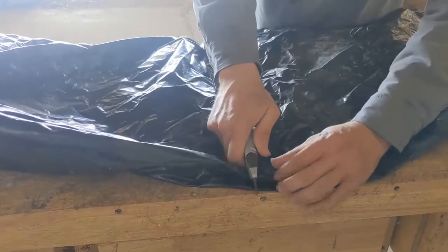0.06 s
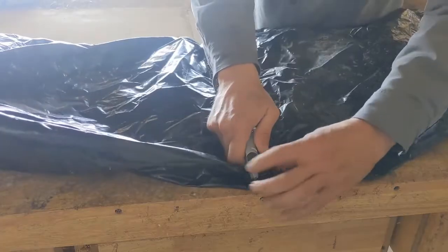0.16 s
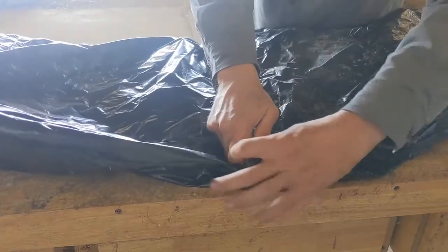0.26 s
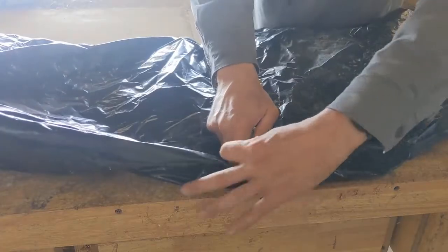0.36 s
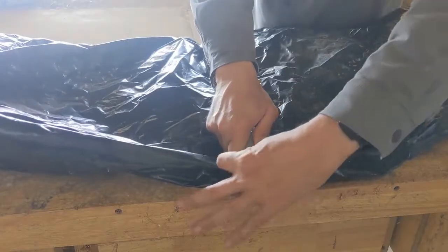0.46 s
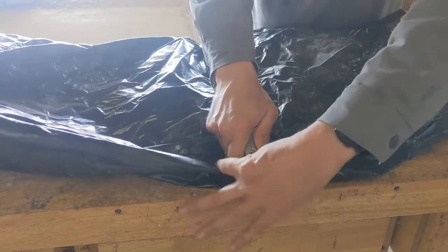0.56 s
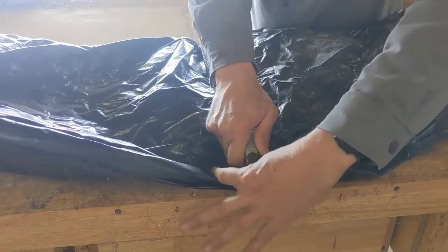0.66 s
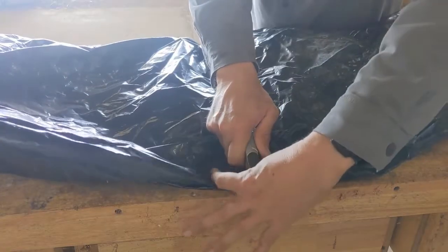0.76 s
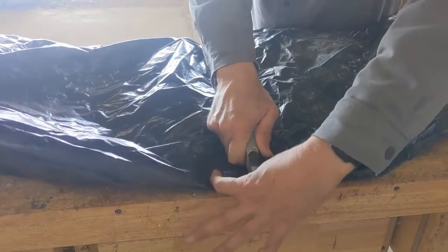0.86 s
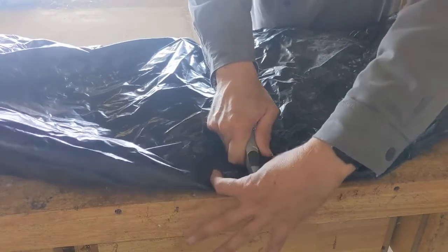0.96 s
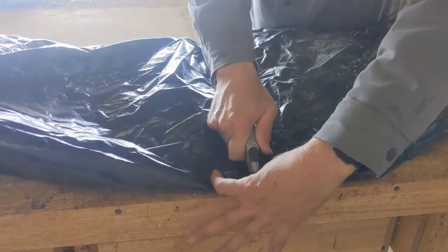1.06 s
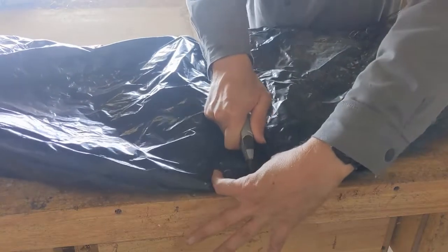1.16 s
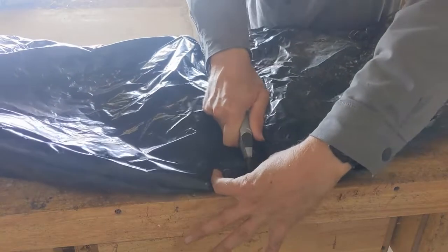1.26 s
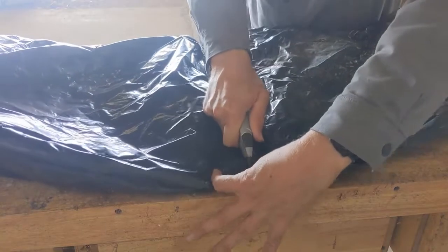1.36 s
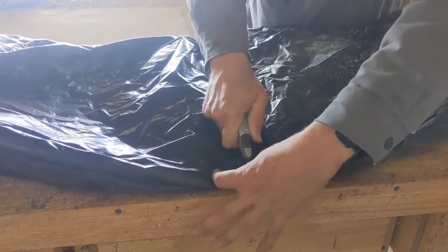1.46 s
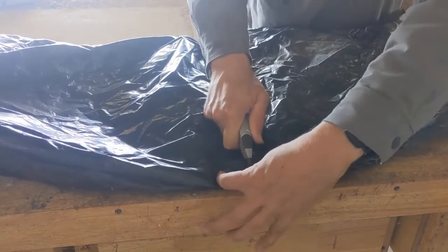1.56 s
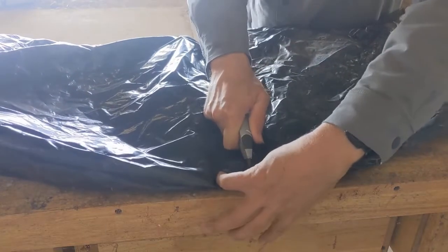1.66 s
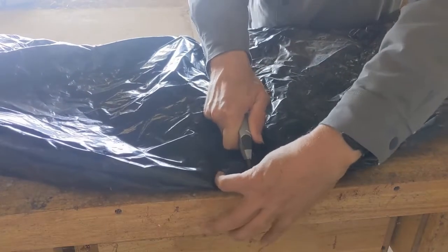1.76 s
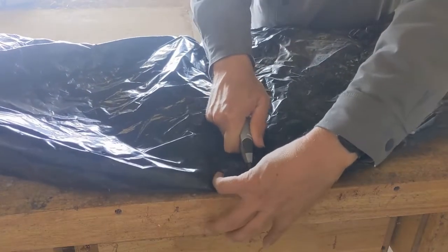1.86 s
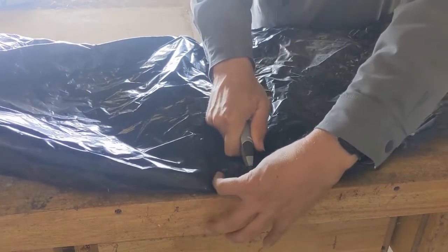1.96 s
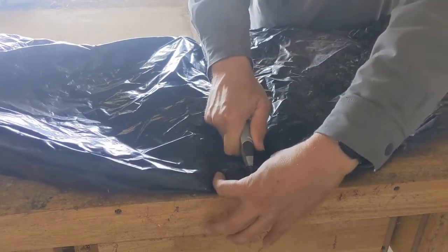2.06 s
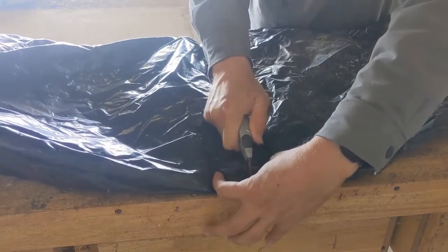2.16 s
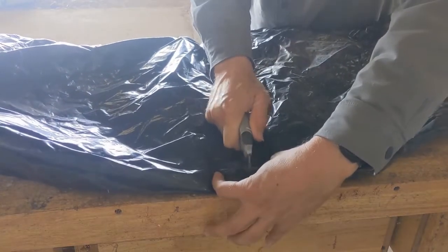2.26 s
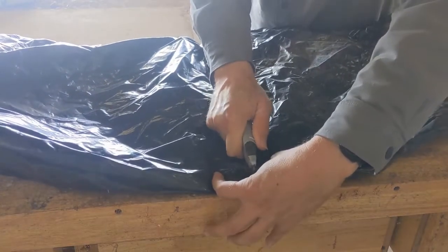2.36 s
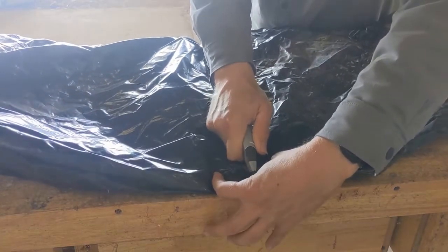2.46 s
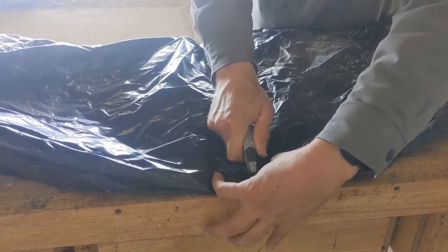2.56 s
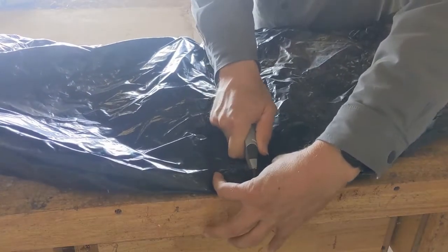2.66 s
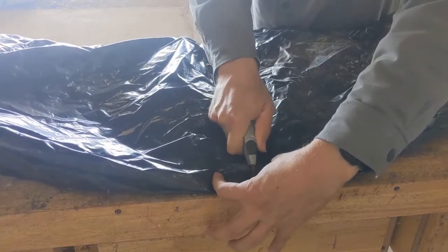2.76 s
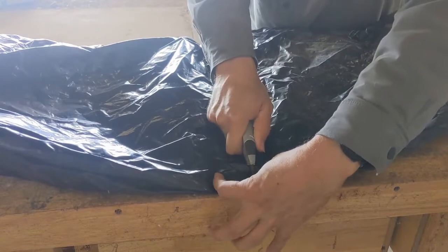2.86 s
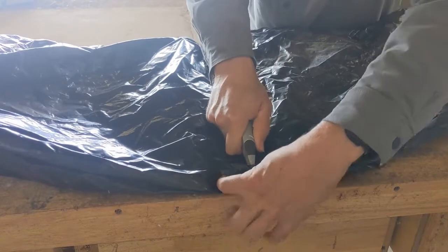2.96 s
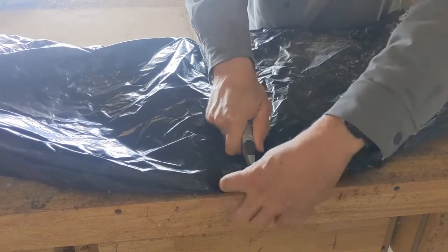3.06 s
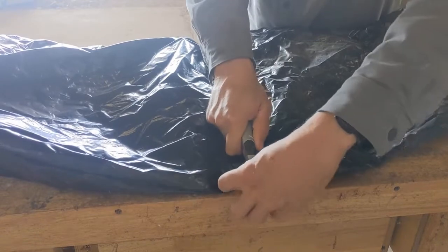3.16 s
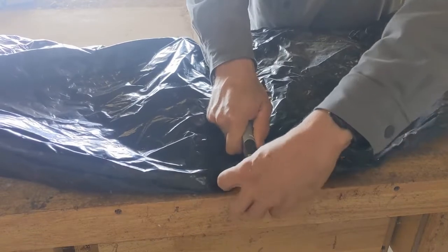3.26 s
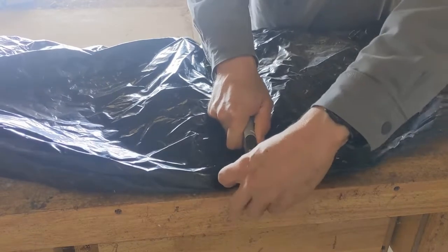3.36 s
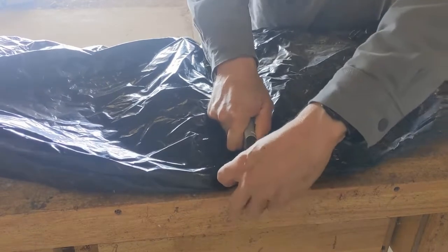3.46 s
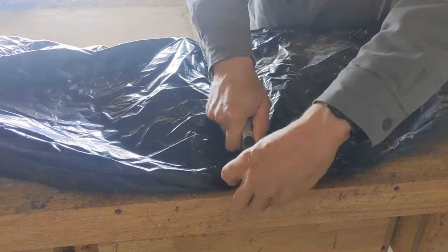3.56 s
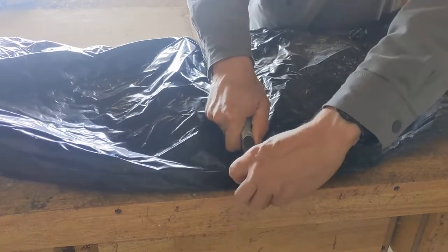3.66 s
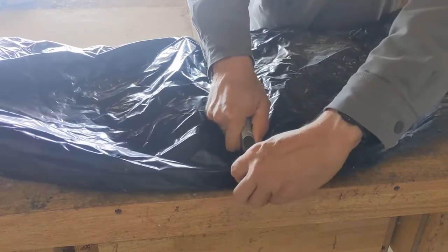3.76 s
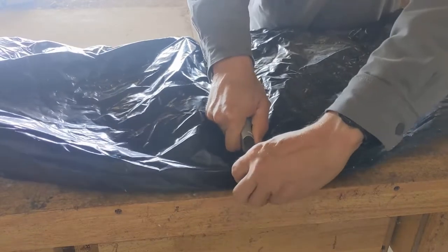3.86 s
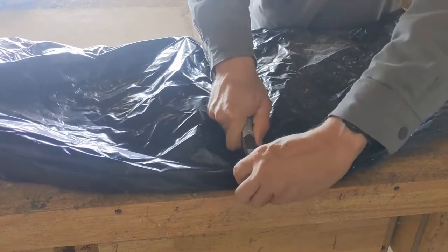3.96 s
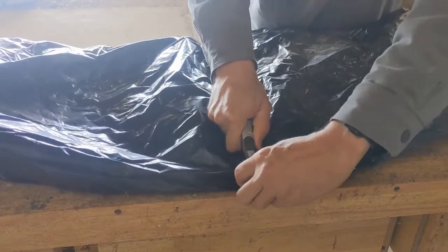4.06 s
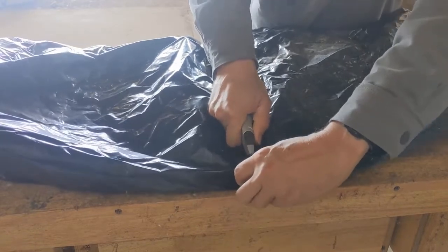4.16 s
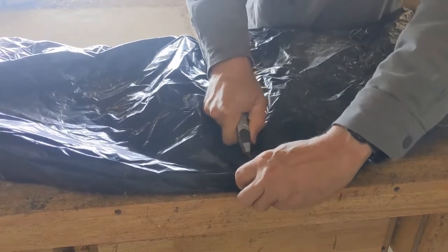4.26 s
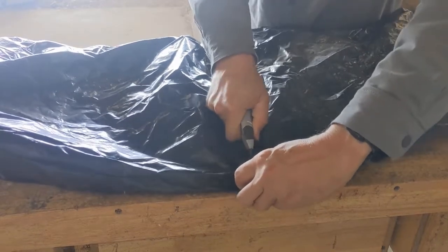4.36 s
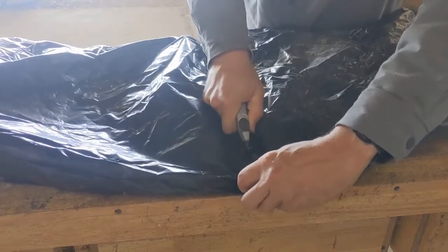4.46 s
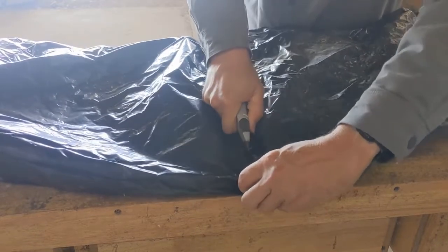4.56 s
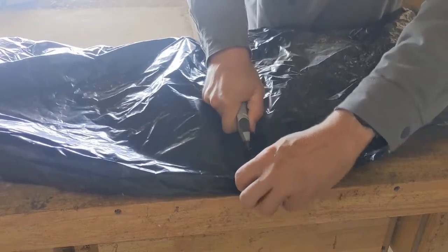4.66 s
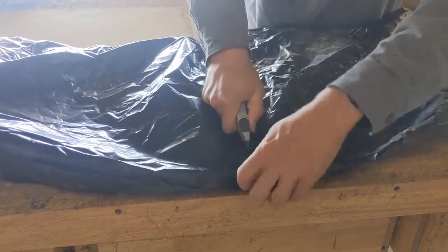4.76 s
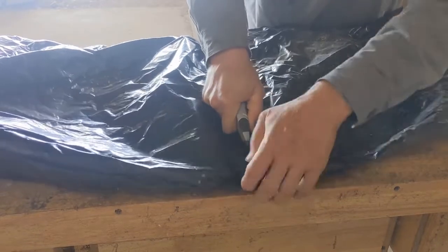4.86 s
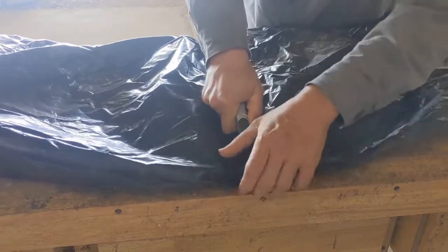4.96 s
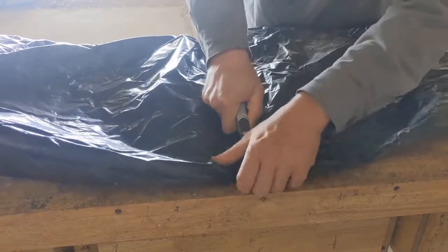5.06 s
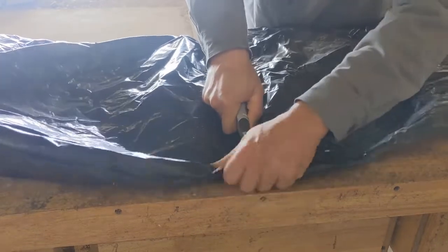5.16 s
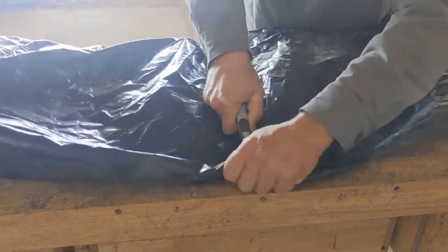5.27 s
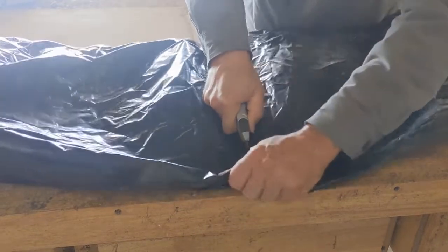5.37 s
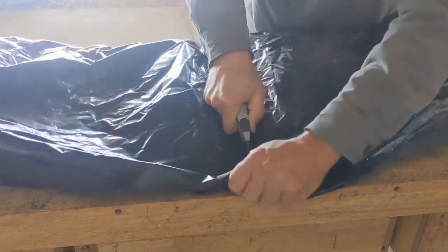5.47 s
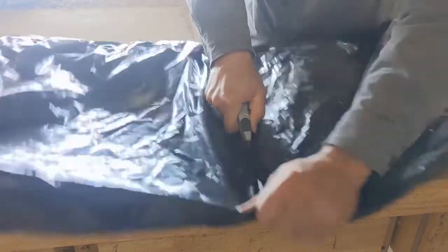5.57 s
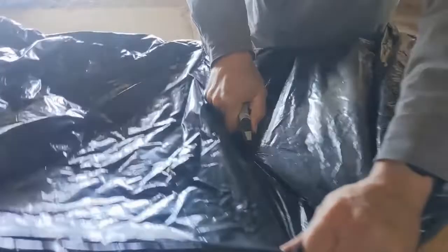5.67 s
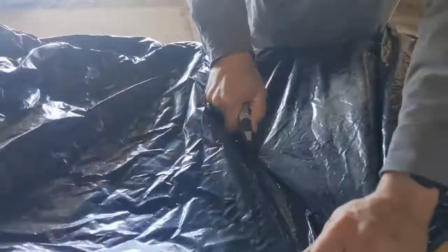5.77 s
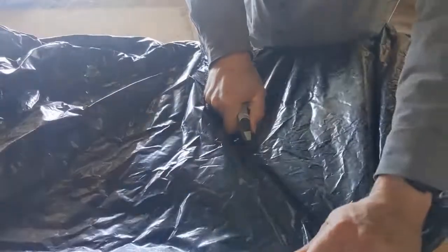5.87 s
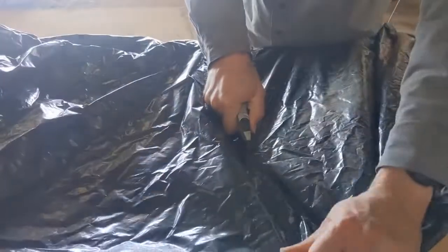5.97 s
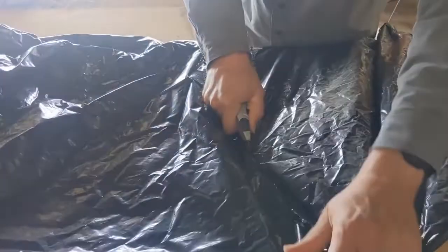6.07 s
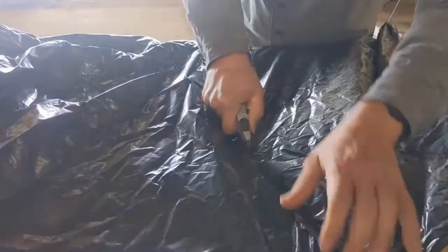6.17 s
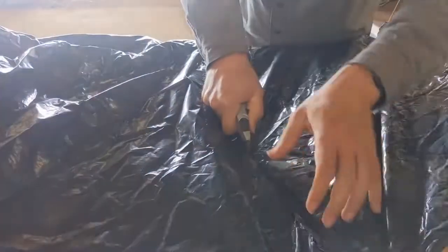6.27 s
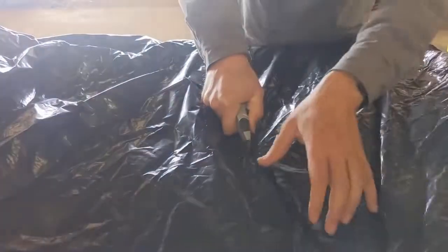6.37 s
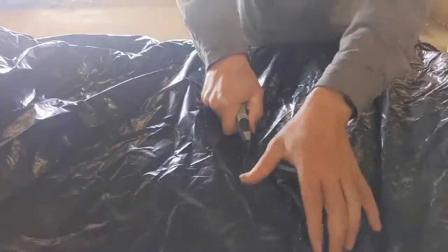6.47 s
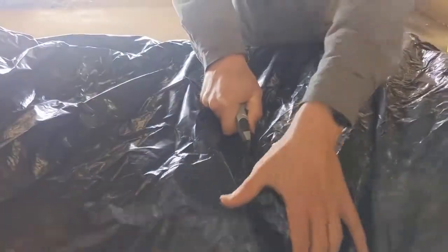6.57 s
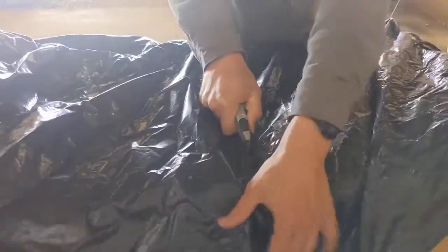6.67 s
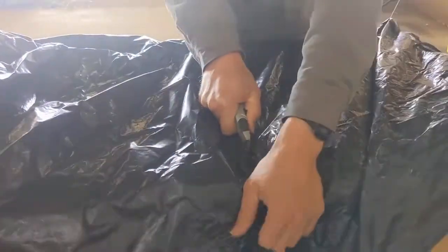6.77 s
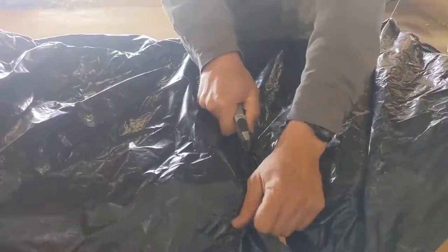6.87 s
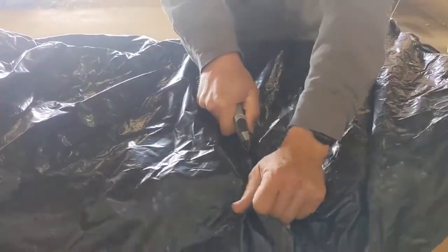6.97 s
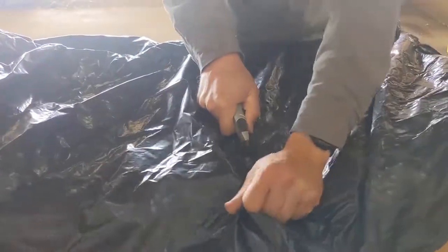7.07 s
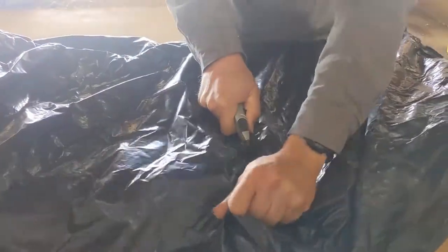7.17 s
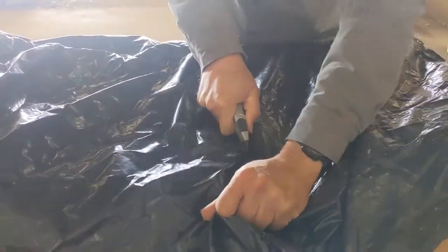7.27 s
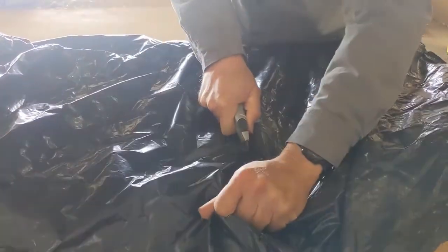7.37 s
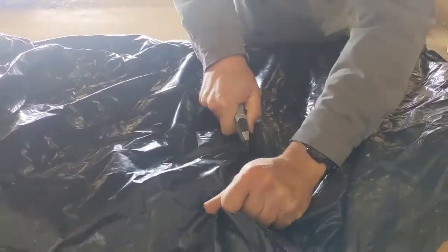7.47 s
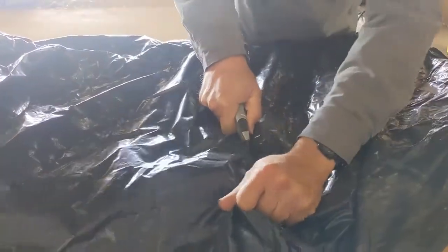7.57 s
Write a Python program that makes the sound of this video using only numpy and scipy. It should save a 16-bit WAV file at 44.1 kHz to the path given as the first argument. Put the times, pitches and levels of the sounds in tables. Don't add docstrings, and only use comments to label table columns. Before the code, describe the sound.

A close stereo pickup in a small, fairly dry workshop, with a faint low motor hum and room murmur throughout. From 0 to 1.1 s thin plastic sheeting gives irregular crisp crackles and soft rustle as hands smooth it; a dense sharp crinkle bursts at about 1.3 s. From 1.6 to 4.2 s it is sparser: isolated dry snaps, bright ticks and dull little pops as a knife is worked in, with near-quiet gaps and a soft bench thud near 2.6 s. Strong tugging crackles come at 4.3-4.7 s, with a very faint, brief steel ring following. After a lull, rustling swells from 5.2 s to the loudest crumpling, air-pushing flip around 5.7-5.9 s. Small crackles fade until 6.4 s, then gripping brings renewed dense crinkles, soft thumps at 6.6 and 6.9 s, the heaviest thump near 7.1 s, and sharp snaps until 7.5 s, when it eases.

```python
import sys
import numpy as np
from scipy import signal
from scipy.fft import rfft, irfft, next_fast_len
from scipy.io import wavfile
from scipy.ndimage import uniform_filter1d, map_coordinates

SR = 44100
rng = np.random.default_rng(int(sys.argv[2]) if len(sys.argv) > 2 else 0)


def attenuation_scalar(level_db):
    decades = np.asarray(level_db, float) / 20
    return 10 ** decades


def unload_audio(sound):
    columns = np.transpose(np.atleast_2d(sound))
    steps = np.round(np.clip(columns, -1, 1) * 32767)
    wavfile.write(sys.argv[1], SR, steps.astype(np.int16))


N = 335601
TOP_HZ = 15850
CONTROL_STEP = 64

# f/Hz, density/dB
FILM = [(180, -12.5), (300, -13), (354, -4.0), (544, -14), (631, -2.0), (796, -3.0), (1140, -0.5),
        (1470, -3.0), (1850, -1.0), (2040, -3), (4510, -5.5), (8320, -12.5), (14100, -9.5),
        (15600, -18)][:-1]
# peak t/s, peak level/dB, rise/s per 20 dB, fall/s per 20 dB (signs ignored), sizzle/dB
PRESSES = [(0.0, -38, -8, 0.06, -1), (0.089, -37.5, -0.4, 0.12, -3), (.52, -47.5, 0.7, -0.5, -7),
           (.68, -45, 0.12, 0.07, 1.5), (0.749, -41.5, 0.05, 0.05, -0.5), (.87, -48.5, -0.4, 0.3, -9.5),
           (.98, -57.5, -0.3, 1.2, -21), (1.277, -28, 0.058, 0.0855, 1), (1.65, -51.5, 0.32, 0.19, -2),
           (2.03, -46.5, 0.1, -0.23, -1.5), (2.127, -48.5, 0.04, -0.23, -2), (2.29, -51, 0, 0.15, -2),
           (2.53, -51, -0.2, 0.18, -0.5), (2.819, -45.5, 0.01, 0.08, -4), (3.06, -56, -0.06, 0.1, 3),
           (3.35, -56, 0.9, 0.7, -12), (3.51, -38.5, 0.0459, 0.09, -2), (3.66, -51.5, 0, 0.34, -4),
           (3.78, -40, 0.06, 0.09, -4.5), (3.95, -50, 0.1, 0.03, -12), (4.07, -51, -0.1, 0.3, -7.5)]
# peak t/s, peak level/dB, rise/s per 20 dB, fall/s per 20 dB (signs ignored), sizzle/dB
PULLS = [(4.38, -31.5, 0.092, 0.082, -1.5), (4.581, -30.5, 0.083, 0.17, -2.5),
         (4.85, -50.5, 0.16, 0.7, -5.5), (5.199, -42.5, 0.14, 0.19, -4.5), (5.289, -37, 0.043, 0.053, -1),
         (5.45, -30.5, 0.25, 0.21, -4.5), (5.759, -16.5, 0.15, 0.16, -3), (5.86, -24, 0.11, 0.052, -6),
         (6.0, -40, 0.12, 0.18, -7), (6.22, -40.5, 0.19, 0.26, -6.5), (6.449, -35.5, 0.031, 0.32, -2),
         (6.72, -37, 0.21, 0.18, -1), (6.87, -27.5, 0.12, 0.089, -4), (6.959, -30.5, 0.12, 0.13, -7),
         (7.148, -30.5, .1, 0.38, -6), (7.4, -32, 0.2, 0.2, -4), (7.59, -47, .05, .1, -16)]


def unit(x):
    return x / np.sqrt(np.mean(x ** 2) + 1e-20)


def along(points, hz):
    f, v = np.transpose(points)
    return np.interp(np.log(hz + 1), np.log(f + 1), v)


def wobble(rate_hz):
    knots = rng.standard_normal(int(N * rate_hz / SR) + 4)
    return map_coordinates(knots, [np.arange(N) * rate_hz / SR])


def filtered(x, gain):
    m = next_fast_len(N + 8192)
    return irfft(rfft(x, m) * gain(np.fft.rfftfreq(m, 1 / SR)), m)[..., :N]


def resonance(hz, centre_hz, width_hz):
    damping = 1j * hz * width_hz
    return damping / (centre_hz ** 2 - hz ** 2 + damping)


def ports(pair, hz):
    # f/Hz, correlation
    alike = [(60, 0.92), (130, 0.97), (290, 0.94), (640, 0.78), (1410, 0.47), (3100, 0.23), (6820, 0.71),
             (15000, 0.66)]
    turn = np.arccos(np.clip(along(alike, hz), 0, 1)) / 2
    mid, side = pair[0] * np.cos(turn), pair[1] * np.sin(turn)
    return np.array([mid + side, mid - side])


def noise(spectrum):
    m = next_fast_len(N + 8192)
    hz = np.fft.rfftfreq(m, 1 / SR)
    pair = ports(rfft(rng.standard_normal((2, m))), hz)
    return unit(irfft(pair * attenuation_scalar(along(spectrum, hz)), m)[:, :N])


def hum():
    # f/Hz, density/dB
    murmur = [(20, -40), (40, -23), (58, 4.5), (74, 1.5), (100, -0.5), (150, 3), (230, -5), (330, -25),
              (500, -25), (750, -10.5), (1500, -23.5), (4500, -27), (9000, -27.5), (15500, -23)]
    # f/Hz, level/dB
    motor = (74, -57.5)
    hz, db = motor
    phase = 2 * np.pi * hz * np.arange(N) / SR + 1.75 * wobble(5.5)
    drone = attenuation_scalar(db + 1.5 * wobble(22)) * np.sin(phase)
    return drone + attenuation_scalar(-54 + 0.27 * wobble(2.5)) * noise(murmur)


def shop(x):
    # f/Hz, t60/s
    decay = [(200, 0.28), (1000, 0.19), (5000, 0.13), (14000, 0.083)]
    predelay = 450
    hz, t, z = signal.stft(rng.standard_normal((2, SR // 2)), SR, nperseg=256)
    fade = attenuation_scalar(-60 * t / along(decay, hz)[:, None])
    tail = signal.istft(ports(z, hz[:, None]) * fade, SR, nperseg=256)[1]
    late = np.pad(x, ((0, 0), (predelay, 0)))
    return signal.fftconvolve(late, tail / np.linalg.norm(tail[0]), axes=1)[:, :N]


def thumps():
    # t/s, peak level/dB, f/Hz
    blows = [(0.11, -37.5, 235), (1.292, -42, 170), (2.32, -50, 372), (2.631, -35.5, 175),
             (4.369, -33, 220), (4.592, -30, 213), (5.75, -30, 173), (6.601, -27.5, 164), (6.882, -28, 144),
             (7.124, -22.5, 216), (7.141, -20.5, 149)]
    modes = [(1, 0, .09), (1.6, -4, .05), (2.3, -6, .04), (3, -8, .03)]
    out, t = np.zeros(N + SR), np.arange(SR // 4) / SR
    onset = 1 - np.exp(-t / .001)
    for s, db, hz in blows:
        ring = sum(attenuation_scalar(mode_db - 60 * t / t60) * np.sin(2 * np.pi * hz * ratio * t)
                   for ratio, mode_db, t60 in modes)
        out[round(s * SR):][:len(t)] += attenuation_scalar(db) * ring * onset
    return filtered(out[:N], lambda hz: 1 / (1 + (105 / (hz + 1)) ** 6))


def swells(moves, lag_s=0):
    s, db, rise_s, fall_s, _ = np.transpose(moves)[:, :, None]
    t = np.arange(0, N + CONTROL_STEP, CONTROL_STEP) / SR - lag_s - s
    distance = np.where(t < 0, -t / np.abs(rise_s), t / np.abs(fall_s))
    return attenuation_scalar(2 * (db - 20 * distance ** 1.5))


def per_sample(x):
    return np.interp(np.arange(N), np.arange(len(x)) * CONTROL_STEP, x)


def flap():
    # f/Hz, density/dB
    air = [(70, -31), (115, -14), (150, 1), (180, -0.5), (230, -5.5), (300, -8.5), (450, -12.5),
           (700, -29.5)]
    press_db, pull_db, still_db, lag_s = -6.5, -3.5, -57.5, 0.0039
    growth = 1.176
    press = attenuation_scalar(2 * press_db) * swells(PRESSES, lag_s).sum(0) ** growth
    pull = attenuation_scalar(2 * pull_db) * swells(PULLS, lag_s).sum(0) ** growth
    push_db = per_sample(10 * np.log10(press + pull + attenuation_scalar(2 * still_db)))
    return attenuation_scalar(push_db - 2.0 + 1.54 * wobble(11)) * noise(air)


def blade():
    # t/s, f/Hz, level/dB
    ring = [
        (4.65, 4330, -53),
        (4.82, 4300, -58),
        (4.9, 4240, -62),
        (5.05, 4170, -68),
    ]
    t = np.arange(N) / SR
    s, ring_hz, ring_db = np.transpose(ring)
    hz, db = np.interp(t, s, ring_hz), np.interp(t, s, ring_db)
    held = np.clip((t - s[0]) / .04, 0, 1) * np.clip((s[-1] - t) / .05, 0, 1)
    phase = 2 * np.pi * np.cumsum(hz) / SR
    level = attenuation_scalar(db + 5 + 2.5 * wobble(60))
    return held * level * np.sin(phase + .7 * wobble(90))


def handling():
    rest_db = -86
    moves = PRESSES + PULLS
    power = swells(moves)
    total = power.sum(0) + attenuation_scalar(2 * rest_db)
    level_db = 10 * np.log10(total)
    boom_db = -3 - 0.0433 * (level_db + 45)
    sizzle_db = np.transpose(moves)[4] @ power / total
    return per_sample(level_db), per_sample(boom_db), per_sample(sizzle_db)


def bursts(count, t60, stutter_db, after_db, size=1024):
    t = (np.arange(size) - 128) / SR
    spike = np.where(t < 0, attenuation_scalar(-18 + 6000 * t), attenuation_scalar(-60 * t / .004))
    after = (t > 0) * attenuation_scalar(after_db - 60 * t / t60)
    jag = attenuation_scalar(stutter_db * rng.standard_normal((count, size // 16))).repeat(16, 1)
    hz = np.fft.rfftfreq(size, 1 / SR)
    grains = rng.standard_normal((2, count, size)) * (spike + after * jag)
    return ports(rfft(grains), hz), hz


def rustle():
    level_db, boom_db, sizzle_db = handling()
    kinds_n = 24
    rate_hz = np.clip(750 * attenuation_scalar(.7 * (level_db + 50)), 420, 8000)

    z, hz = bursts(count=kinds_n, t60=.016, stutter_db=4, after_db=-7)
    panel_hz = np.geomspace(500, 13000, kinds_n)[:, None]
    panel = 0.36 + np.exp(-(np.log((hz + 1) / panel_hz) / .5) ** 2)
    kinds = irfft(z * attenuation_scalar(along(FILM, hz)) * panel / (panel_hz / 3000) ** 0.31)

    clumps = attenuation_scalar(3 * wobble(70) + 1.5 * wobble(20))
    kind, at = np.nonzero(rng.random((kinds_n, N)) < rate_hz * clumps / SR / kinds_n)
    size_db = np.minimum(3.9 * rng.exponential(size=(kinds_n, N)), 11)[kind, at]
    lag = rng.integers(0, 7, (kinds_n, N))[kind, at]
    hits = np.zeros((2, kinds_n, N + 8))
    force = attenuation_scalar(size_db) / np.sqrt(rate_hz[at])
    hits[0, kind, at + lag] = force
    hits[1, kind, at + 3] = force
    creases = unit(signal.oaconvolve(hits, kinds, axes=2).sum(1)[:, :N])

    hiss = attenuation_scalar(-4.5 + 1.2 * wobble(25)) * noise(FILM)
    sheet = creases + hiss
    low = filtered(sheet, lambda hz: 1 / (1 + (hz / 1500) ** 4))
    high = filtered(sheet, lambda hz: 1 / (1 + (6000 / (hz + 1)) ** 4))
    middle = sheet - low - high
    return attenuation_scalar(level_db + 1.0) * (middle + low * attenuation_scalar(boom_db) + high * attenuation_scalar(sizzle_db + 9.0))


def snaps():
    # t/s, peak level/dB, panel f/Hz, edge rel. level/dB, body rel. level/dB
    smoothing = [(0.073, -19.5, 1440, -21, -24), (0.322, -35.5, 3130, -27, -17),
                 (0.465, -33.5, 3500, -25, -7), (0.524, -22.5, 7850, -17, -11), (0.629, -28, 790, -17, -5),
                 (0.683, -26, 2120, -22, -7), (0.703, -26.5, 773, -9, -16), (0.739, -17.5, 820, -21.5, -18),
                 (0.78, -30.5, 1090, -35, -7), (0.847, -30, 1160, -25, -9), (0.876, -29.5, 1150, -20, -7),
                 (0.948, -14.5, 1260, -6, -9.5), (0.989, -16, 1750, -14, -14), (1.074, -32, 1800, -16, -29),
                 (1.229, -21, 783, -7.5, -2), (1.338, -16, 715, -5.5, -8.5), (1.372, -13.5, 5300, -20, -27),
                 (1.643, -27, 4170, -14, -19.5), (1.718, -20.5, 2760, -11.5, -17),
                 (1.789, -35, 5290, -21, -14)]
    # t/s, peak level/dB, panel f/Hz, edge rel. level/dB, body rel. level/dB
    piercing = [(1.914, -31.5, 2950, -25, -14), (1.955, -24.5, 5240, -14, -9), (1.963, -28, 5500, -8, -27),
                (1.979, -14.5, 5450, -4.5, -28), (2.019, -28.5, 4460, -7, -17),
                (2.041, -15.5, 5050, -5.5, -17), (2.116, -12.5, 6300, -15.5, -29),
                (2.252, -27.5, 1790, -17, -13.5), (2.319, -26.5, 1270, -20.5, -10.5),
                (2.449, -24.5, 1560, -12.5, -14), (2.471, -29.5, 1560, -13, -8.5),
                (2.512, -26, 3420, -13.5, -11), (2.557, -29, 4640, -11, -25),
                (2.609, -18, 2000, -14.5, -15.5), (2.775, -23, 1780, -15.5, -18),
                (2.794, -21.5, 800, -14.5, -15), (2.858, -23.5, 795, -25, -20.5),
                (3.05, -25, 6200, -19, -17), (3.039, -42, 832, -20, -3), (3.064, -29, 1600, -18, -17),
                (3.119, -25, 1640, -19.5, -16.5)]
    # t/s, peak level/dB, panel f/Hz, edge rel. level/dB, body rel. level/dB
    cutting = [(3.386, -36.5, 1540, -32, -6), (3.469, -27, 1760, -23, -6), (3.517, -20.5, 3650, -19.5, -16),
               (3.645, -17, 2540, -9.5, -21), (3.679, -23, 802, -13, -21.5), (3.715, -25, 711, -16, -14),
               (3.745, -19.5, 3800, -25, -17), (3.811, -19, 1750, -22, -14.5),
               (3.855, -24.5, 3130, -20, -16), (3.933, -23, 3630, -22.5, -15),
               (3.973, -34.5, 1770, -32, -7), (4.01, -41, 2930, -22, -5), (4.035, -24.5, 2390, -30, -9.5),
               (4.082, -27.5, 1140, -15, -11), (4.231, -31, 1050, -16, -21)]
    # t/s, peak level/dB, panel f/Hz, edge rel. level/dB, body rel. level/dB
    tugging = [(4.3, -26.5, 1580, 2, -20), (4.341, -22, 891, -5, -16), (4.363, -14.5, 770, -21, -23),
               (4.516, -16, 2640, -13, -25), (4.537, -11.5, 1130, -16, -20), (4.569, -10.5, 5500, -19, -18),
               (4.629, -10, 3490, -13, -21), (4.711, -16.5, 2540, -14, -16),
               (4.774, -24.5, 2610, -36, -20.5), (4.921, -38, 1810, -48, -8), (4.966, -27.5, 781, -15, -23),
               (5.158, -28, 4500, -22.5, -13), (5.208, -25, 1840, -12, -15), (5.264, -10, 6650, -12, -15),
               (5.337, -12, 5200, -7, -21), (5.553, -20.5, 1310, -15, -12), (5.643, -23, 1040, -9, -6),
               (5.675, -5.5, 1150, -10, -25), (6.02, -25, 1900, -19, -16)]
    # t/s, peak level/dB, panel f/Hz, edge rel. level/dB, body rel. level/dB
    gripping = [(6.441, -25.5, 4460, -18, -11), (6.547, -20.5, 1840, -32, -24),
                (6.736, -17.5, 4500, -17.5, -32), (6.777, -23.5, 3650, -22, -18),
                (6.817, -17, 1090, -23, -20), (6.95, -14.5, 4570, -9, -22), (7.018, -24.5, 1840, -25, -8),
                (7.143, -17.5, 3630, -20, -21), (7.2, -13.5, 3860, -16, -26), (7.246, -8.5, 1150, -13, -30),
                (7.307, -10.5, 1620, -9, -14), (7.355, -9.5, 1640, -5, -21), (7.366, -14, 1820, -23, -16),
                (7.41, -14.5, 4340, -10, -9), (7.503, -13.5, 5350, -7, -14), (7.587, -25.5, 1900, -27, -13)]
    # t/s, peak level/dB, panel f/Hz, edge rel.
    # level/dB, body rel. level/dB
    further_creases = [(0.0368, -28, 4750, -20, -20), (0.5691, -40, 810, -18, -6), (0.825, -40, 678, -12, 0),
                       (0.885, -32, 2950, -16, -17), (1.212, -18.5, 1110, -12, -12.5), (1.263, -14, 6330, -10, -15),
                       (1.268, -15.5, 7320, -7, -24), (1.2794, -21, 4810, -12, -15), (1.2884, -14, 1740, -7, -20),
                       (1.299, -12, 974, -8, -19), (1.511, -41, 1030, -13, -12), (1.5703, -50, 789, -18.5, -10),
                       (1.5938, -47, 942, -10, -10.5), (1.628, -29.5, 1140, -11, -23), (1.8477, -38, 786, -15, -13),
                       (1.893, -37, 2990, -18.5, -9), (2.1293, -23.5, 7110, -17, -26), (2.2233, -46, 1610, 0, 0),
                       (2.4174, -49, 799, 12, 1), (2.5176, -27.5, 1170, -10, -18), (2.7398, -37, 654, -1.5, -1),
                       (2.7812, -20.5, 810, -13, -21), (2.8388, -31, 799, -9, -27), (2.9032, -32, 4540, -21, -14),
                       (3.1433, -29, 2890, -16, -24.5), (3.3955, -39.5, 837, -24, -8), (3.4356, -39, 802, -5, 2),
                       (3.4744, -28, 720, -15.5, -1), (3.722, -22.5, 1780, -18, -22), (3.7968, -21, 1770, -13, -12),
                       (3.9485, -29, 1810, -8, -11), (4.151, -44, 4170, -17, -20), (4.5934, -10, 802, -18, -20),
                       (4.6793, -21, 5800, -4, -18), (4.819, -32, 4330, -13, -4), (5.034, -41.5, 821, -6, -13),
                       (5.0898, -40, 2660, -14, -19),
                       (5.3422, -13.5, 5070, -17, -22), (5.3502, -12.5, 4470, -14, -16),
                (5.3594, -16, 681, -14, -7), (5.3754, -19, 2360, -19, -18), (5.3936, -16, 1170, -15, -22),
                (5.533, -25, 1320, -17, -13), (5.581, -18.5, 5330, -22, -12), (5.6258, -21, 665, -15, -12),
                (5.6876, -4.5, 1810, -11, -16), (5.7811, -4, 1150, -14, -13), (5.8144, -5, 1590, -18, -23),
                (5.8382, -8.5, 1800, -19, -16), (5.892, -14.5, 3540, -23, -21),
                (6.0516, -33, 2080, -18, -11), (6.0854, -29, 3060, -16, -13), (6.1295, -29, 692, -19, -17),
                (6.1494, -34, 1030, -23, -11), (6.1993, -27, 4910, -17, -19), (6.2512, -30, 1020, -15, -18),
                (6.2968, -33, 1620, -14, -10), (6.3344, -34.5, 1140, -17, -3),
                (6.3617, -34.5, 2140, -29, -10), (6.402, -35, 2200, -29, -6),
                (6.4282, -24.5, 1810, -17, -11), (6.4618, -24, 4490, -17, -15),
                (6.4748, -21.5, 1020, -18, -16), (6.6742, -24, 960, -21, -21), (6.907, -19, 1790, -20, -23),
                (6.9255, -17, 1890, -17, -15), (6.9414, -19, 1160, -10, -17), (6.9777, -20, 1110, -14, -5),
                (7.041, -25, 1830, -16, -13), (7.1136, -24, 743, -11, -18), (7.1484, -17, 3640, -24, -17),
                (7.1529, -16.5, 1800, -22, -18), (7.47, -18, 1750, -15, -14), (7.4776, -20, 1760, -13, -15),
                (7.5623, -30, 1880, -12, -9)]
    # t/s, peak level/dB, panel f/Hz, edge rel. level/dB, body rel. level/dB
    opening = [
        (0.083, -25, 1020, -10, -11),
        (0.091, -25, 1980, -14, -7),
        (0.102, -28, 813, -16, -11),
        (0.111, -28, 2930, -18, -11),
        (0.127, -27, 2910, -16, -17.5),
        (0.223, -33, 729, -19, -6.5),
    ]
    # t/s, peak level/dB, panel f/Hz, edge rel. level/dB, body rel. level/dB
    flattening = [
        (0.494, -29, 700, -6, -2),
        (0.544, -41, 654, -11, -8),
        (0.594, -38, 662, -12, -6),
        (0.658, -30, 810, -14, -8),
        (0.719, -22.5, 1770, -14, -16),
        (0.759, -25.5, 1120, -19, -11),
        (0.804, -43, 1050, -17, -10),
        (0.914, -38, 1090, 9, -1),
        (1.014, -36.5, 750, -19, -8),
        (1.039, -44, 1030, -7, -9),
    ]
    events = (smoothing + piercing + cutting + tugging + gripping
              + further_creases + opening + flattening)
    s, peak_db, panel_hz, edge_db, body_db = np.transpose(events)[:, :, None]
    late_s = .0012

    z, hz = bursts(count=len(s), t60=.04, stutter_db=4, after_db=-11)
    low = 1 / (1 + (hz / 2500) ** 4)
    high = 1 / (1 + (7000 / (hz + 1)) ** 4)
    tone_db = along(FILM, hz) + low * (body_db + 10.0) + high * (edge_db + 23.0)
    panel = 1 + 1.64 * resonance(hz, panel_hz, .24 * panel_hz)
    rows = irfft(z * attenuation_scalar(tone_db) * panel)
    peak = np.abs(rows.mean(0)).max(1)[:, None]
    rows = rows / peak * attenuation_scalar(peak_db + 5)

    start = np.round((s + late_s) * SR).astype(int)
    at = (start + np.arange(rows.shape[2])).ravel()
    return np.array([np.bincount(at, r.ravel(), N + 2048)[128:N + 128] for r in rows])


def hollow(x):
    # f/Hz, width/Hz, gain
    pockets = [(790, 70, .5), (1140, 90, .25), (1790, 120, .25)]
    return filtered(x, lambda hz: 1 + sum(g * resonance(hz, c, w) for c, w, g in pockets))


def scene():
    cracks = hollow(snaps())
    near = hollow(rustle()) + thumps() + flap()
    steel = blade() * attenuation_scalar([[2], [-2]])
    walls = shop(attenuation_scalar(-10.5) * cracks + attenuation_scalar(-13.0) * near)
    return cracks + near + steel + walls + hum()


def starve(x, margin_db, hole_db):
    hz, _, z = signal.stft(x, SR, nperseg=512)
    smooth = uniform_filter1d(np.abs(z) ** 2, size=5, axis=1)
    patch = np.abs(uniform_filter1d(smooth, size=3, axis=2))
    weak = (patch < patch[::-1] * attenuation_scalar(-2 * margin_db)) & (hz > 11500)[:, None]
    around = uniform_filter1d(uniform_filter1d(patch, size=60, axis=1), size=3, axis=2)
    weak |= (patch < around * attenuation_scalar(-2 * hole_db)) & ((hz > 7000) & (hz < 9500))[:, None]
    top = np.abs(z[:, hz > 12000]).mean(1, keepdims=True)
    steady = top < 2.9 * uniform_filter1d(top, size=13, axis=2)
    weak |= steady & (hz > TOP_HZ)[:, None]
    return signal.istft(z * np.where(weak, .01, 1), SR, nperseg=512)[1][:, :N]


def band_limit(x):
    return signal.sosfilt(signal.butter(12, 16970, fs=SR, output="sos"), x)


def record(dry):
    # f/Hz, level/dB
    lean = [(60, 1), (700, .5), (4400, -1.5), (10000, -3), (12000, -7), (13200, -16), (16000, -19)]
    # f/Hz, width/Hz, level/dB
    cavities = [(13780, 260, 7), (14700, 300, 5), (4500, 200, 3)]
    ceiling = .87

    def response(hz):
        shade_db = along(lean, hz)
        cavity_db = sum(db / (1 + (2 * (hz - c) / w) ** 2) for c, w, db in cavities)
        roof_db = -5 / (1 + (13500 / (hz + 1)) ** 16) - 14 * (hz > TOP_HZ) - 90 * (hz > 16900)
        rumble_cut_db = -6 / (1 + (hz / 30) ** 6)
        return attenuation_scalar(np.array([.95 * shade_db, cavity_db - .05 * shade_db]) + roof_db + rumble_cut_db)

    x = filtered(dry, response)
    x[0] = np.roll(x[0], 1)
    x = x / (1 + np.abs(x / ceiling) ** 4) ** .25
    mix = starve(x, margin_db=32.0, hole_db=4)
    return band_limit(mix)


dry = scene()
out = record(dry)
unload_audio(out)
```